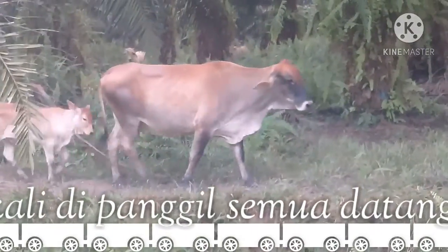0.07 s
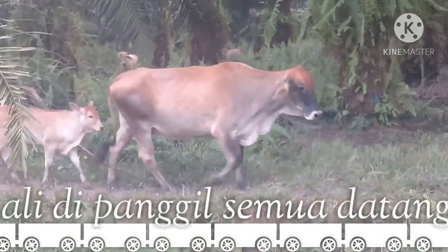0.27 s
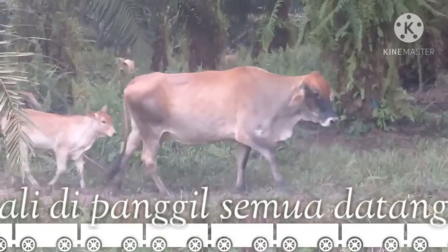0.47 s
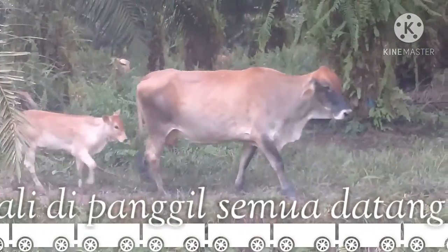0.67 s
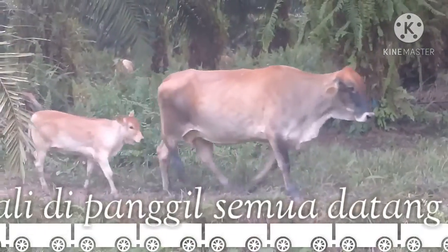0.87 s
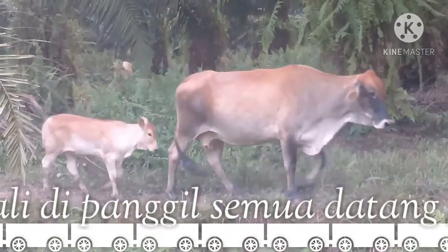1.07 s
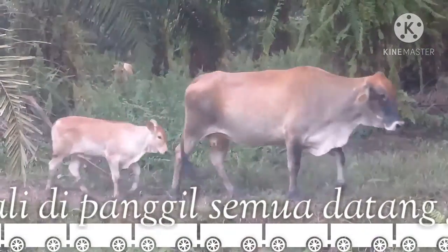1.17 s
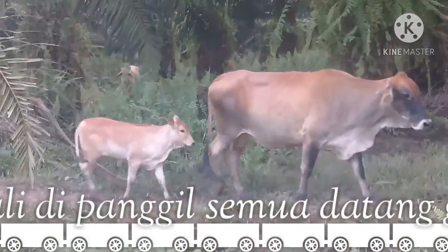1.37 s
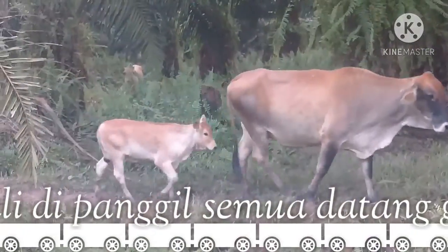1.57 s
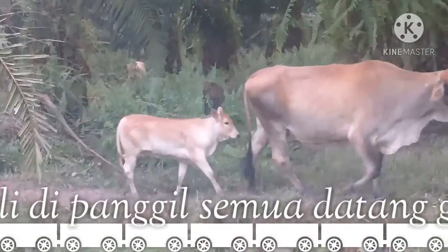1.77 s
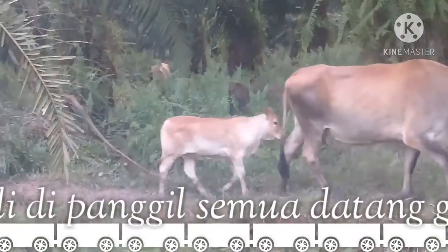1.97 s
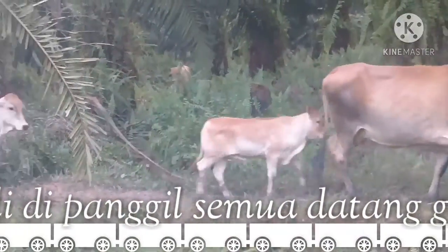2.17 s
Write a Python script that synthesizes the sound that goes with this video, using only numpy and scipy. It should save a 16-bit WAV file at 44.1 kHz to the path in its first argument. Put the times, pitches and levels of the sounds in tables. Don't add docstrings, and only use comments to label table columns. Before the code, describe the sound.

One short, rough, low cow moo outdoors, with faint insects, bird whistles and hoof knocks

```python
import sys
import numpy as np
from scipy import signal
from scipy.io import wavfile
from scipy.ndimage import uniform_filter1d

SR = 44100
rng = np.random.default_rng(int(sys.argv[2]) if len(sys.argv) > 2 else 0)


def elevation(decibels):
    levels = np.asarray(decibels, float)
    return 10 ** (levels / 20)


def transcribe(u):
    v = np.clip(np.atleast_2d(u).T, -1, 1)
    q = np.round(v * 32767).astype(np.int16)
    wavfile.write(sys.argv[1], SR, q)


N = 98475


def evened(x):
    return x / np.sqrt(np.mean(x ** 2) + 1e-20)


def read(points, hz):
    f, value = np.transpose(points)
    return np.interp(np.log(hz + 1), np.log(f + 1), value)


def add(mix, s, sound):
    part = mix[round(s * SR):][:len(sound)]
    part += sound[:len(part)]


def resonate(x, hz, width):
    turn = np.exp(2j * np.pi * np.cumsum(hz * np.ones(len(x))) / SR)
    r = np.exp(-np.pi * width / SR)
    return 2 * (turn * signal.lfilter([1 - r], [1, -r], x / turn + 1e-18)).real


def noise(points, patchy_db):
    a, b, p = rng.standard_normal((N // 128 + 5, 257, 3)).T
    p = evened(uniform_filter1d(uniform_filter1d(p, 6, 0), 16, 1))
    colour_db = read(points, np.fft.rfftfreq(512, 1 / SR))[:, None]
    z = (a + 1j * b) * elevation(colour_db + patchy_db * p)
    return evened(signal.istft(z, nperseg=512, noverlap=384)[1][:N])


def swishes(rows):
    t = np.arange(N) / SR
    return sum(elevation(db) * np.exp(-np.where(t < s, (s - t) / rise, (t - s) / fall))
               for s, rise, fall, db in rows)


def drift():
    return evened(uniform_filter1d(uniform_filter1d(rng.standard_normal(N), 2500), 2500))


def air():
    # frequency in Hz, level in dB per Hz.
    tone = [(30, 9), (120, 0.5), (400, -8), (1500, -13.5), (3300, -12.5), (6600, -21), (10500, -18),
            (15500, -33)]
    return elevation(-68) * noise(tone, patchy_db=1.2)


def wind():
    # time in seconds, level in dB.
    gusts = [(0, -4.5), (.5, -1), (.8, 0.5), (.95, 5), (1.152, 4.5), (1.3, 1), (1.9, 14), (2.1, 5.5),
             (2.23, 5)]
    gust_db = np.interp(np.arange(N) / SR, *np.transpose(gusts))
    rumble = resonate(resonate(rng.standard_normal(N), 84, 100), 84, 260)
    return elevation(-68 + 1.5 * drift() + gust_db) * evened(rumble)


def insects():
    # frequency in Hz, width in Hz, level in dB.
    bands = [(2197, 320, -78), (3063, 220, -80), (2783, 520, -72), (3814, 69, -81), (4600, 2000, -63),
             (5710, 66, -75), (7130, 870, -82.5), (8090, 2860, -72.5)]
    # time in seconds, level in dB.
    swell = [(0, 1), (.25, 0.5), (.4, 1.5), (.75, 5.5), (.95, -0.5), (1.1, 5.5), (1.9, 4), (2.23, 1.5)]
    t = np.arange(N) / SR
    flat = noise([(20, 0), (20000, 0)], patchy_db=2.0)
    chorus = sum(elevation(db) * evened(resonate(resonate(flat, hz, w), hz, w)) for hz, w, db in bands)
    clicks = .4 + np.cos(np.pi * 126 * t) ** 4
    throb = 1.1 + np.cos(np.pi * 9 * (t - .08)) ** 2
    buzz_hz, width_hz = 9900, 650
    buzz = clicks * throb * rng.standard_normal(N)
    buzz = resonate(resonate(buzz, buzz_hz, width_hz), buzz_hz, width_hz)
    return chorus * elevation(np.interp(t, *np.transpose(swell))) + elevation(-66) * evened(buzz)


def birds():
    # start in seconds, length in seconds, from Hz, to Hz, level in dB.
    whistles = [(0.346, 0.098, 5300, 5350, -56), (0.381, 0.014, 4660, 4470, -48.5),
                (0.583, 0.015, 4730, 4600, -48), (0.62, 0.011, 4750, 4650, -43.5),
                (0.633, 0.013, 4650, 4600, -50), (0.841, 0.061, 3780, 3730, -51.5),
                (0.875, 0.13, 4395, 4300, -50.5), (.92, 0.19, 4370, 4050, -56.5),
                (2.027, 0.0091, 5230, 4600, -65), (2.068, 0.017, 5170, 4550, -46.5),
                (2.096, 0.025, 5230, 4500, -45), (2.138, 0.028, 5020, 4600, -52)]
    # start and length in seconds, from and to Hz, dB.
    far_low = (.87, .22, 243, 255, -58)
    out = np.zeros(N)
    for s, length, from_hz, to_hz, db in whistles + [far_low]:
        u = np.arange(0, length, 1 / SR) / length
        hz = to_hz + (from_hz - to_hz) * (1 - u) ** 2.11
        blur = evened(resonate(rng.standard_normal(len(u)), hz, .07 * to_hz))
        pure = np.sin(2 * np.pi * np.cumsum(hz) / SR)
        whistled = to_hz > 1000
        pure_share = max(.7 - 4 * length * whistled, .2)
        blur_share = min(8 * length, .8) * whistled
        add(out, s, elevation(db) * np.sin(np.pi * u) ** .7 * (pure_share * pure + blur_share * blur))
    return out


def brushing():
    # peak in seconds, rise in seconds, fall in seconds, level in dB.
    grass = [(.18, .03, .04, -72), (.56, .008, .015, -68), (.61, .012, .02, -58), (.672, .01, .03, -65),
             (1.268, .025, .012, -58), (1.355, .01, .025, -55), (1.47, .07, .07, -63),
             (1.59, .006, .012, -53), (1.78, .04, .04, -64), (1.64, .03, .08, -63), (1.84, .015, .015, -64),
             (2.012, .008, .012, -66), (2.068, .006, .008, -66), (2.12, .025, .05, -64)]
    # frequency in Hz, level in dB per Hz.
    grass_tone = [(150, -30), (800, -14), (2500, -7), (6500, -12), (9000, -7), (11500, 0), (15500, -9)]
    # peak in seconds, rise in seconds,
    # fall in seconds, level in dB.
    litter = [(0.624, 0.027, 0.027, -60), (.672, 0.006, 0.029, -57.5), (1.87, 0.019, .07, -54.5),
              (2.1, 0.029, 0.095, -64), (0.93, 0.11, 0.31, -67)]
    # frequency in Hz, level in dB per Hz.
    litter_tone = [(150, -11), (500, -3.5), (1200, -4), (2500, -4.5), (5000, -23)]
    snaps = (rng.random(N) < 400 / SR) * rng.exponential(1, N)
    crackle = 1 + .3 * evened(uniform_filter1d(snaps, 60))
    swish = elevation(3) * swishes(grass) * noise(grass_tone, patchy_db=1.5)
    shuffle = swishes(litter) * noise(litter_tone, patchy_db=1.5)
    return crackle * (swish + shuffle)


def hoof_knocks():
    # time in seconds, level in dB, frequency in Hz, ring t60 in seconds.
    knocks = [(.09, -62, 890, 0.08), (0.617, -43, 2190, 0.072), (0.618, -51.5, 1440, .03),
              (0.667, -47, 1080, 0.03), (.671, -47, 810, 0.036), (.669, -47.5, 2480, 0.034),
              (.67, -48, 3500, .03), (0.671, -45, 4360, 0.028), (.669, -51, 417, 0.03),
              (0.704, -55, 830, 0.07), (0.8155, -39, 4300, 0.018), (1.81, -42, 2690, 0.067),
              (1.811, -41, 3930, 0.055), (1.829, -48, 2750, 0.043), (1.945, -32, 1160, 0.068),
              (1.978, -40.5, 1510, 0.054), (2.025, -44, 1100, .06), (2.059, -40, 1200, 0.17)]
    out = np.zeros(N)
    u = np.arange(3000) / SR
    for s, db, hz, t60 in knocks:
        knock = elevation(db - 60 * u / t60) * (.7 * rng.standard_normal(len(u)) + 9 * (u == 0))
        for width in (.25 * min(hz, 2600), .4 * min(hz, 2600), .5 * hz):
            knock = resonate(knock, hz, width)
        add(out, s, np.sqrt(SR / hz) * knock)
    return out


def trees(x):
    # frequency in Hz, t60 in seconds.
    fading = [(200, 0.83), (450, 0.63), (1000, 0.78), (1500, 0.68), (2000, 1.06), (4500, 0.38)]
    # delay in seconds, spread in seconds, level in dB.
    trunks = [
        (0.156, 0.0061, -39),
        (.2, 0.014, -48.5),
        (.29, 0.039, -58),
    ]
    taps = np.zeros(SR)
    at = np.arange(400, SR - 40, 40)
    taps[at + rng.integers(0, 40, len(at))] = rng.choice([-1., 1.], len(at))
    taps *= rng.exponential(1, SR)
    hz, t, z = signal.stft(taps, SR, nperseg=256)
    tail = signal.istft(z * elevation(-60 * t / read(fading, hz)[:, None]), SR, nperseg=256)[1][:SR]
    tail *= elevation(-16.5) / np.linalg.norm(tail)
    for delay, spread, db in trunks:
        clump = taps * np.exp(-((np.arange(SR) / SR - delay) / spread) ** 2)
        clump = resonate(resonate(clump, 1350, 1300), 1350, 1300)
        tail += elevation(db) * clump / np.linalg.norm(clump)
    return signal.fftconvolve(x, tail)[:N]


def snort():
    # start in seconds, length in seconds, level in dB.
    breath = (1.805, 0.14, -45)
    # frequency in Hz, width in Hz, level in dB.
    nose = [(2750, 730, -3.7), (3810, 300, -8), (5270, 410, -2)]
    start, length, level_db = breath
    out, t = np.zeros(N), np.arange(0, length, 1 / SR)
    flow = rng.standard_normal(len(t))
    hiss = sum(elevation(db - 60 * t * hz / 1900) * evened(resonate(resonate(flow, hz, w), hz, w))
               for hz, w, db in nose)
    edges = np.minimum(t / 0.0022, 1) * np.minimum((length - t) / 0.023, 1)
    add(out, start, elevation(level_db) * hiss * edges)
    return out


def fold_pulses(turns, on):
    jitter_s, shimmer_db = .00006, .8
    at = np.flatnonzero(np.diff(np.floor(turns - 1e-9), prepend=-1) > 0)
    luck = rng.standard_normal((len(at), 2))
    pulses = np.zeros(N)
    pulses[at + np.round(jitter_s * SR * luck[:, 0]).astype(int)] = elevation(shimmer_db * luck[:, 1])
    return pulses / np.sqrt(np.mean(pulses[on] ** 2))


def ring_throat(drive, phase, mouth, throat):
    open_folds = 1 / (1 + np.exp(-12 * (phase - .62)))
    out = np.zeros(N)
    for k, (hz, width, db, gain_db) in enumerate(throat):
        fed = drive * elevation(gain_db * mouth + .9 * drift())
        stretch = .085 * mouth / (1 + (hz / 1300) ** 6)
        ring = resonate(fed, hz * (1 + .005 * drift() + stretch), width)
        damp_db = -6 * open_folds * min(hz / 1500, 1) ** 2
        out += (-1) ** k * elevation(db + 23 + damp_db) * ring
    return out


def breath_rush(phase, on, effort_db, mouth):
    # frequency in Hz, width in Hz, level in dB, dB gained as the mouth opens.
    bands = [(2220, 194, -26.5, -3.5), (2574, 81, -24.5, -6)]
    late = phase - .31
    flow = on * np.exp(-(late / .31) ** 2) * elevation(effort_db) * rng.standard_normal(N)
    return sum(elevation(db + 33 + gain_db * mouth)
               * resonate(resonate(flow, hz * (1 + .086 * late), w), hz, 2 * w)
               for hz, w, db, gain_db in bands)


def voice(pitch, control, throat, slackens):
    low_orders = [-26, -13, -9.5]
    # frequency in Hz, width in Hz, share 0-1.
    pockets = [
        (328, 65, 1),
        (466, 110, 0.07),
        (680, 29, 1),
    ]
    t = np.arange(N) / SR + .0007
    ts, hz = np.transpose(pitch)
    on = (t >= ts[0]) & (t < ts[-1])
    turns = np.cumsum(np.interp(t, ts, hz) * on) / SR
    phase = turns % 1
    times, *curves = np.transpose(control)
    effort_db, chest_db, mouth = [np.interp(t, times, c) for c in curves]

    pulses = fold_pulses(turns, on)
    puff = np.exp(-phase / .35)
    puffs = on * puff * rng.standard_normal(N)
    slack = np.clip((t - ts[-1]) / .052 + 1, 0, 1) * slackens
    breath_db = -8 + 9 * np.clip((t - ts[-1]) / .06 + 1, 0, 1)
    drive = (pulses * elevation(-3 * slack) + elevation(breath_db) * puffs) * elevation(effort_db)

    chest_hz = 267.5
    chest = resonate(resonate(pulses * elevation(chest_db + 26.5), chest_hz, 31), chest_hz, 80)
    body = ring_throat(drive, phase, mouth, throat) + chest
    for f, w, share in pockets:
        body = body - np.clip(share * mouth, 0, 1) * resonate(body, f, w)

    hiss = evened(resonate(rng.standard_normal(N), 4340, 1100))
    hiss = elevation(-19.5 + effort_db) * on * (.5 + puff) * hiss
    low = sum(elevation(db) * np.cos(2 * np.pi * (k + 1) * turns) for k, db in enumerate(low_orders))
    low_level = uniform_filter1d(on * elevation(.5 * (chest_db + effort_db) - 1.5), 600)
    low = low * elevation(-8 * slack) * low_level
    return body + breath_rush(phase, on, effort_db, mouth) + hiss + low


def hum():
    # time in seconds, pulse rate in Hz.
    pitch = [(1.0739, 67.63), (1.0989, 61.87), (1.1189, 47.18), (1.1539, 48.56), (1.1839, 53.82),
             (1.2239, 56.51), (1.2839, 59.41)]
    # time in seconds, effort in dB, chest in dB, throat shaping behind the shut lips 0-1.
    control = [
        (1.075, -67.5, -67, 0),
        (1.107, -53, -59, 0.23),
        (1.125, -50, -50, 0.67),
        (1.146, -52.5, -45.5, 0.66),
        (1.167, -45.5, -44.5, 1),
        (1.206, -41, -39.5, 0.87),
        (1.275, -41, -41, 0.96),
    ]
    # frequency in Hz, width in Hz, level in dB, dB gained at full throat shaping.
    throat = [(440, 68, -0.5, -4), (847, 35, -21.5, 10), (1246, 127, -10, 3.5), (1580, 360, -6, -5),
              (1864, 16, 10.5, -10), (2430, 62, 5.5, -27.5), (4300, 91, 5, -23)]
    return voice(pitch, control, throat, slackens=False)


def moo():
    # time in seconds, pulse rate in Hz.
    pitch = [(1.2892, 61.54), (1.3592, 66.77), (1.4292, 67.67), (1.5092, 69.97), (1.5792, 68.04),
             (1.6492, 66.67), (1.7292, 64.11), (1.7892, 58.43), (1.8542, 44.9)]
    # time in seconds, effort in dB, chest in dB, mouth opening 0-1.
    control = [
        (1.29, -28, -33, 0.063),
        (1.34, -26.5, -33, 0.37),
        (1.39, -26.5, -29.5, 0.066),
        (1.47, -27, -27.5, 0.45),
        (1.52, -26.5, -30.5, 1),
        (1.59, -25, -32, 0.6),
        (1.608, -23, -31, 1),
        (1.794, -27, -32, 0.46),
        (1.847, -41.5, -34.5, 1),
    ]
    # frequency in Hz, width in Hz, level in dB, dB gained as the mouth opens.
    throat = [(575.6, 80, -9.5, 2), (859, 35, 0.6, 0.5), (1100, 107, -9.5, -1), (1495.6, 53, -3.5, -1),
              (1864, 50.7, -7.5, 3), (2053, 166, -20, 1.5), (4500, 140, -41.5, 12), (5130, 37, -32, 7)]
    return voice(pitch, control, throat, slackens=True)


def scene():
    soft_top = signal.butter(4, 5800, fs=SR, output="sos")
    cow = signal.sosfilt(soft_top, hum() + moo()) + snort()
    ground = brushing() + hoof_knocks()
    return (cow + trees(cow) + insects() + birds() + ground + wind() + air())[None]


def band_limit(x):
    return signal.sosfilt(signal.butter(12, 15610, fs=SR, output="sos"), x)


def record(dry):
    bass_cut = signal.butter(3, 46, "high", fs=SR)
    return band_limit(signal.lfilter(*bass_cut, dry))


dry = scene()
out = record(dry)
transcribe(out)
```